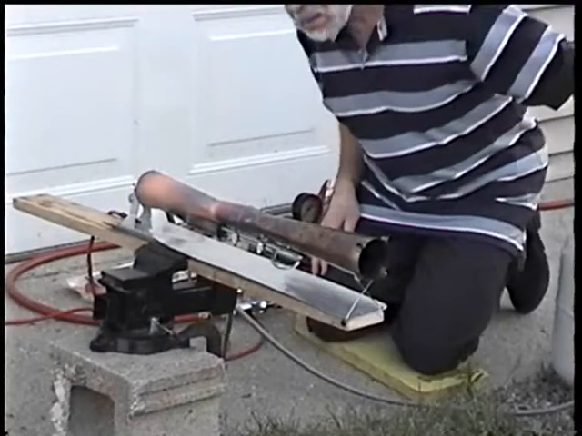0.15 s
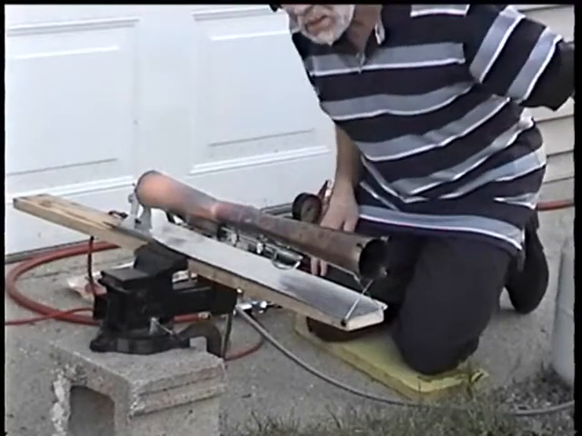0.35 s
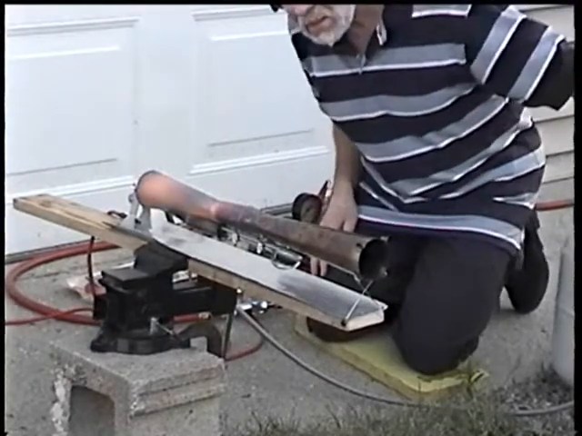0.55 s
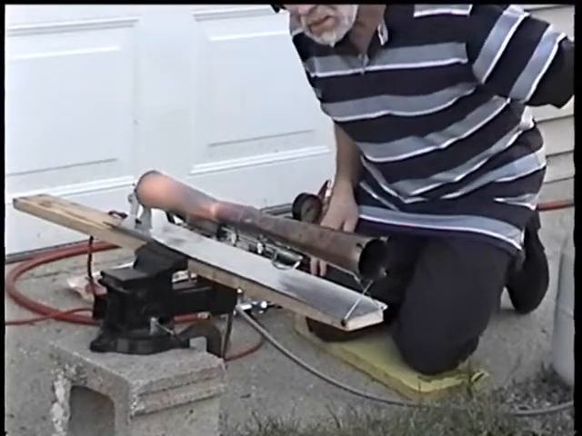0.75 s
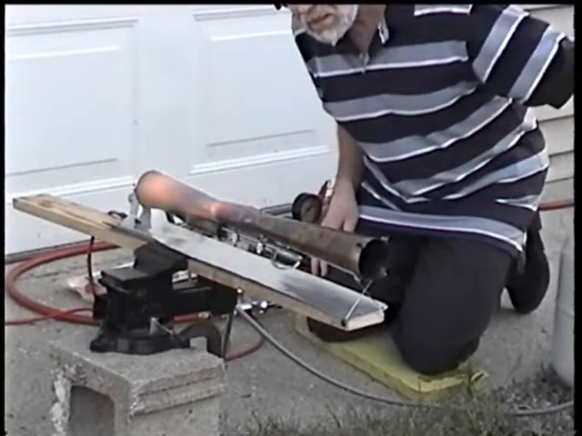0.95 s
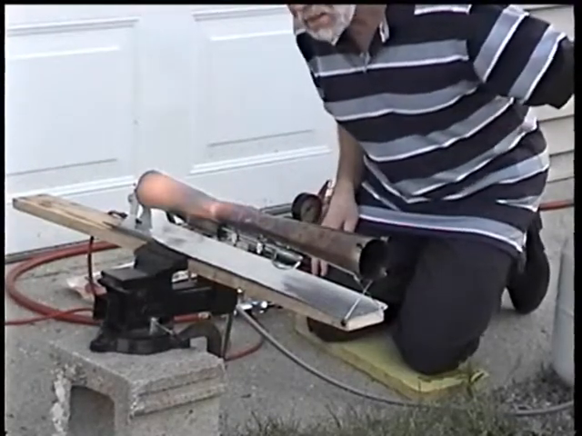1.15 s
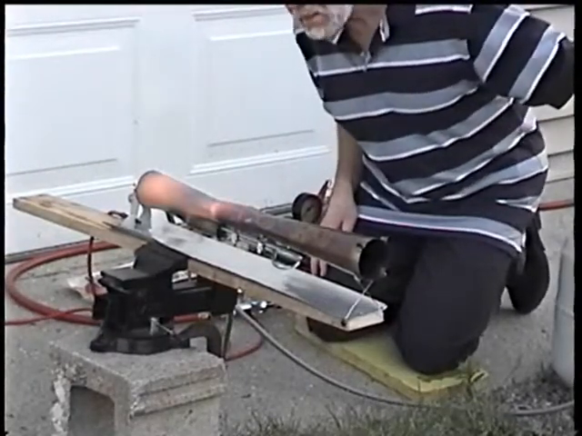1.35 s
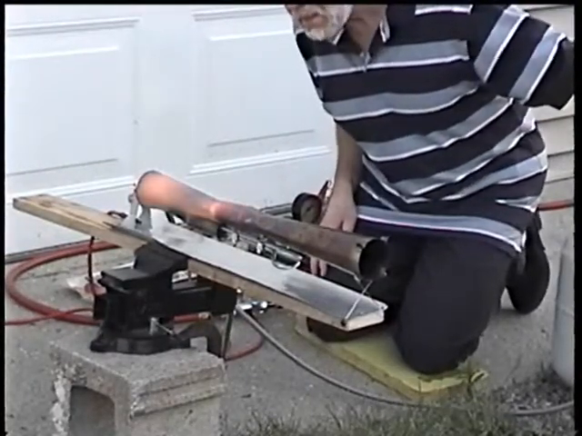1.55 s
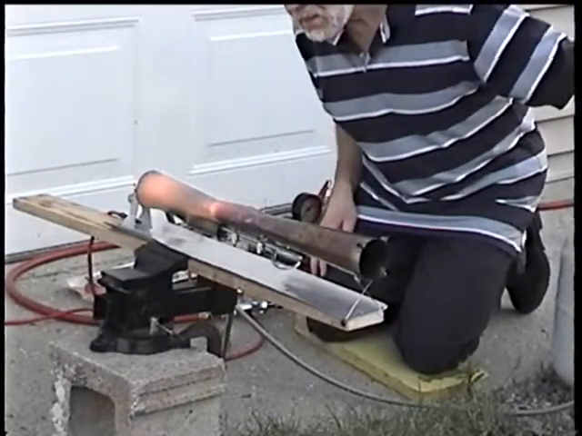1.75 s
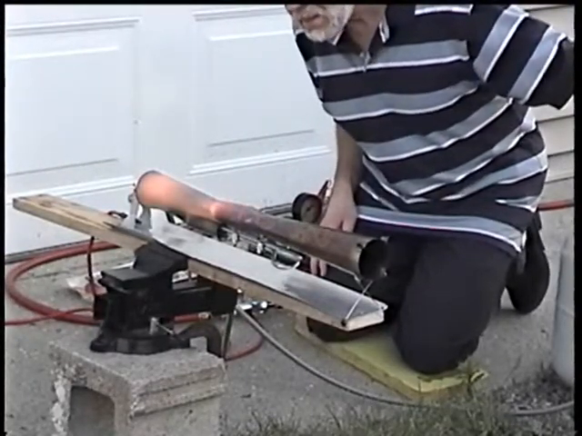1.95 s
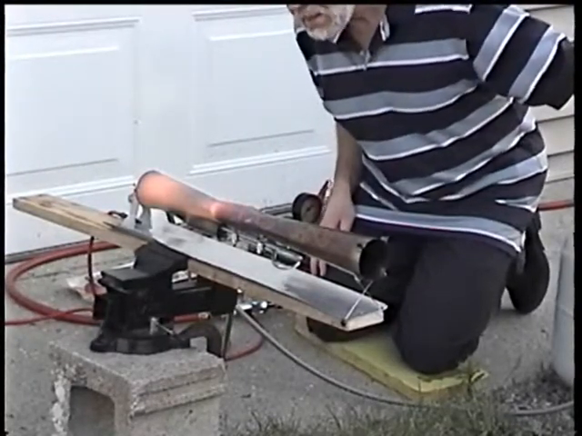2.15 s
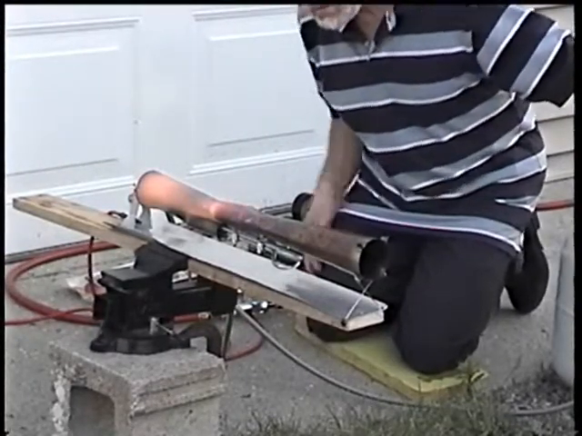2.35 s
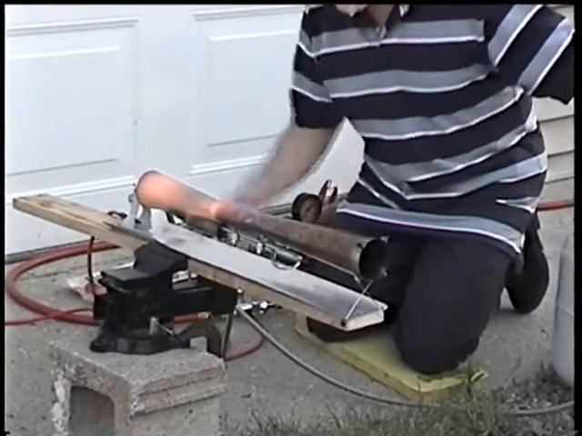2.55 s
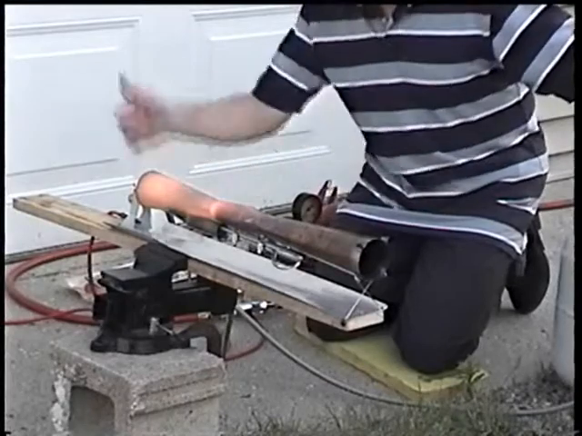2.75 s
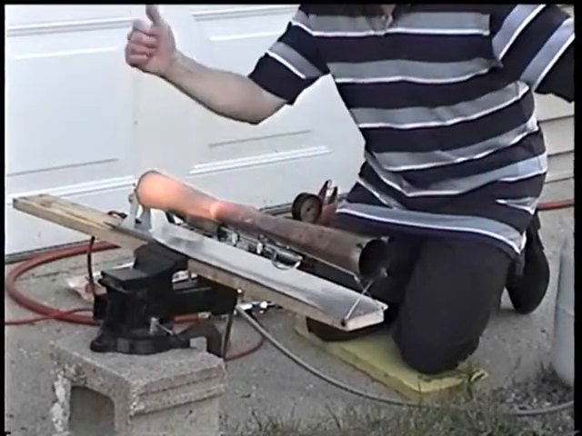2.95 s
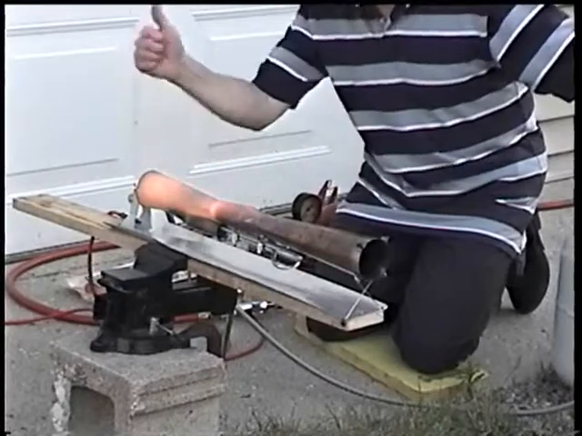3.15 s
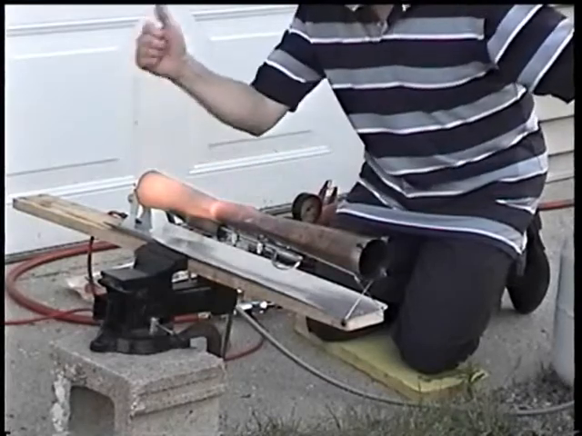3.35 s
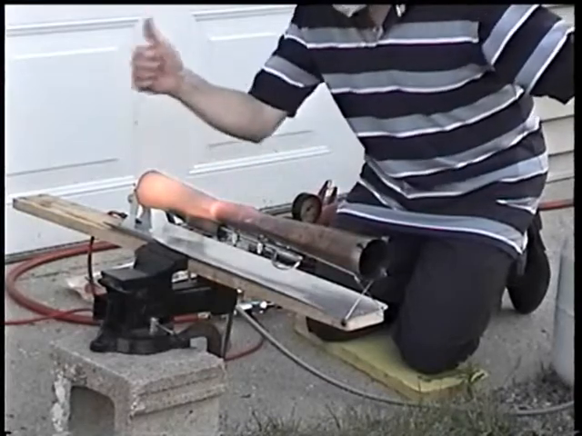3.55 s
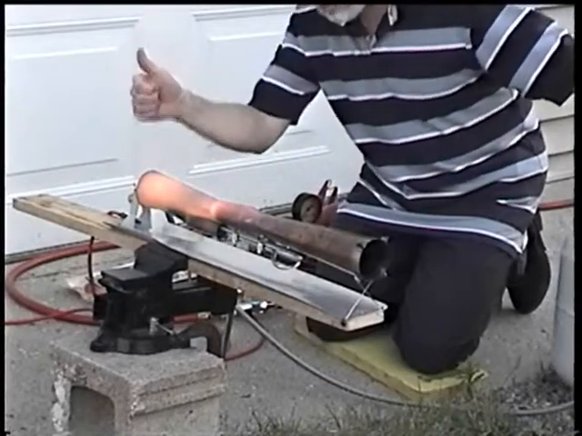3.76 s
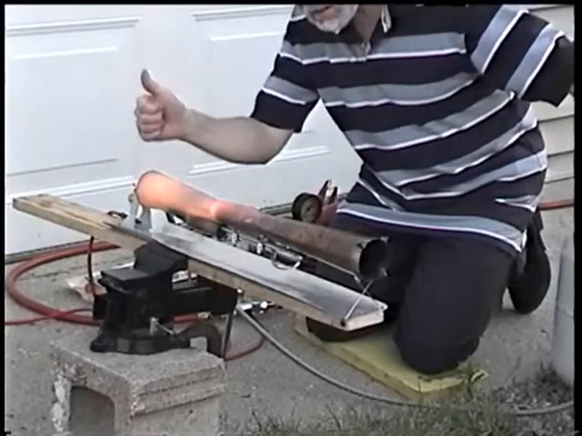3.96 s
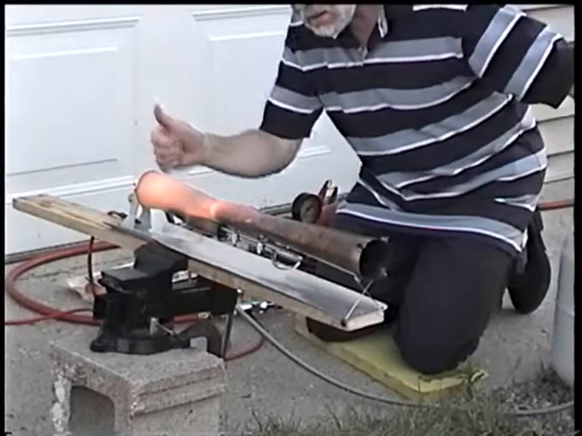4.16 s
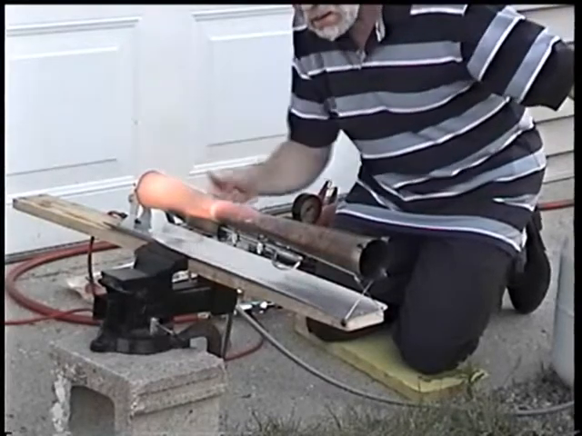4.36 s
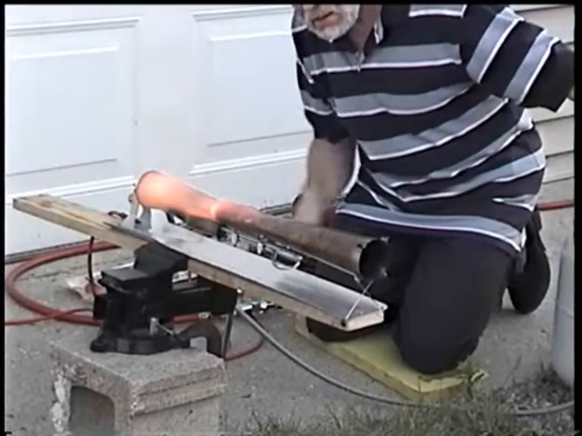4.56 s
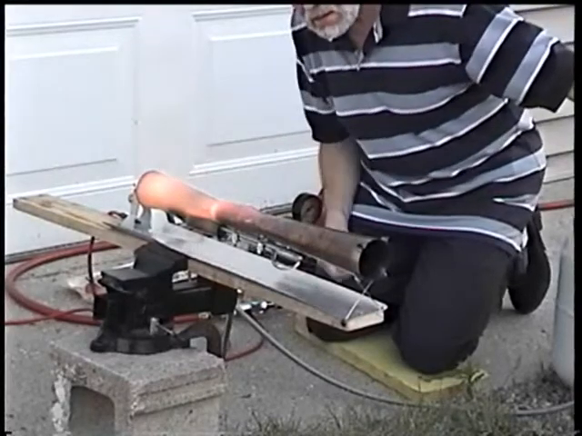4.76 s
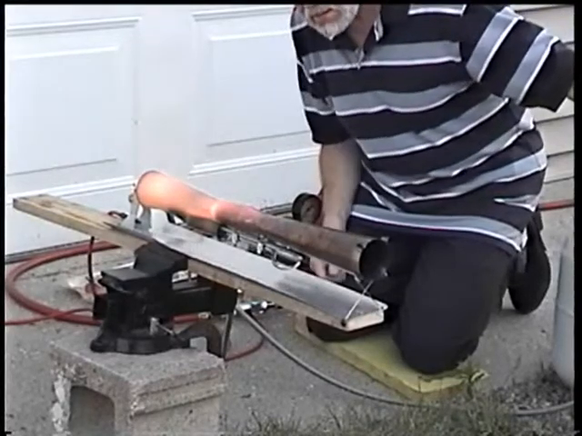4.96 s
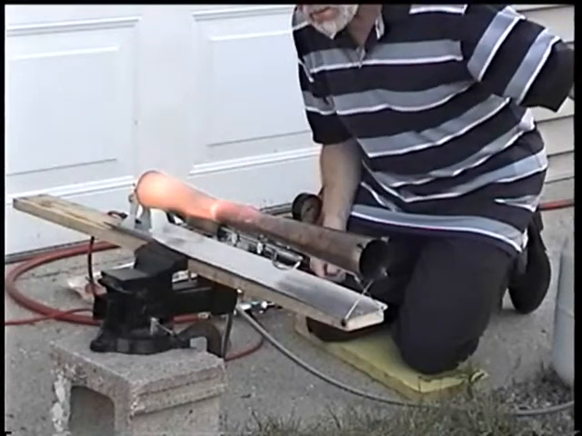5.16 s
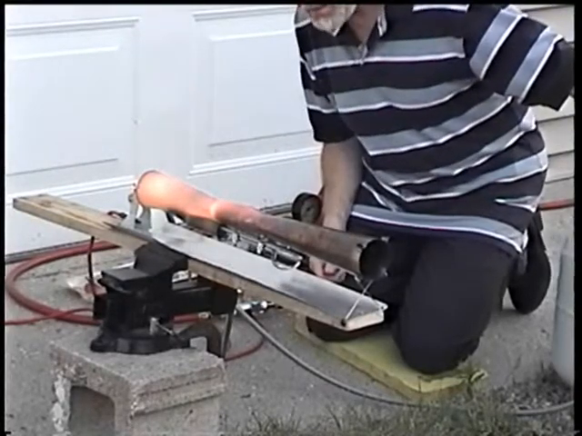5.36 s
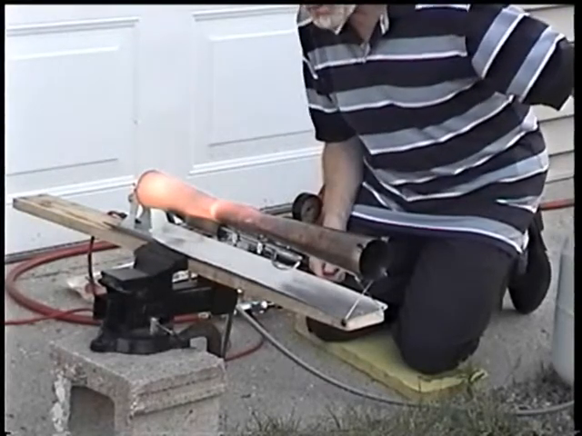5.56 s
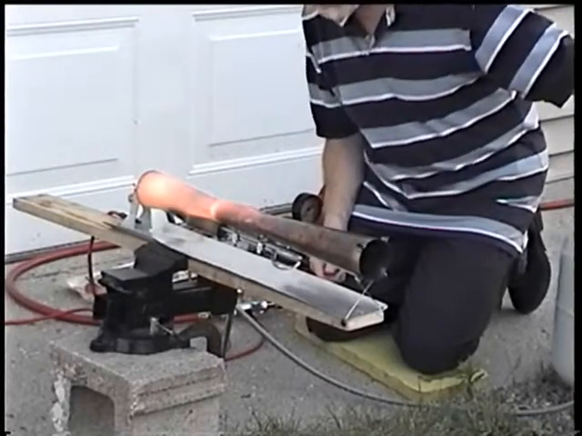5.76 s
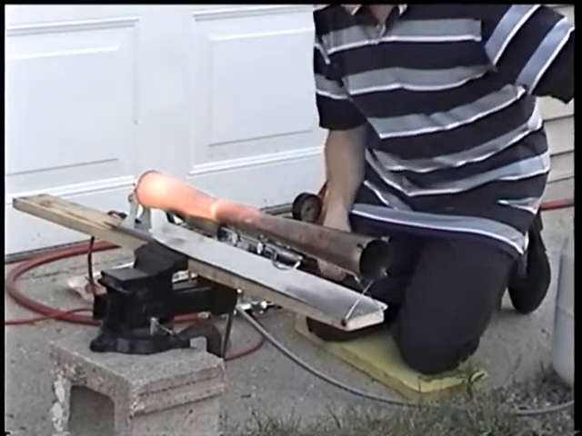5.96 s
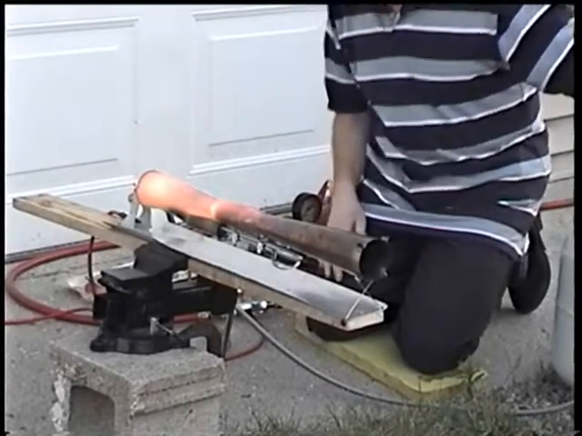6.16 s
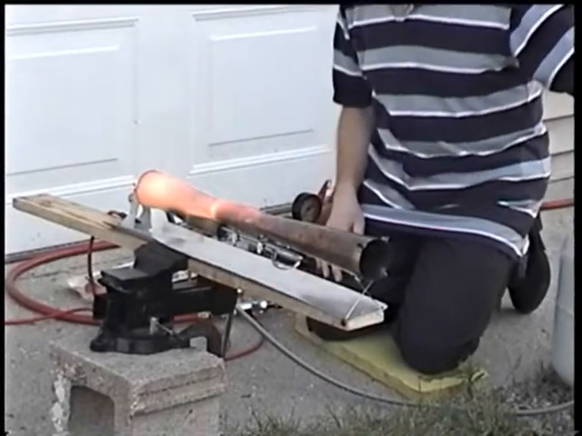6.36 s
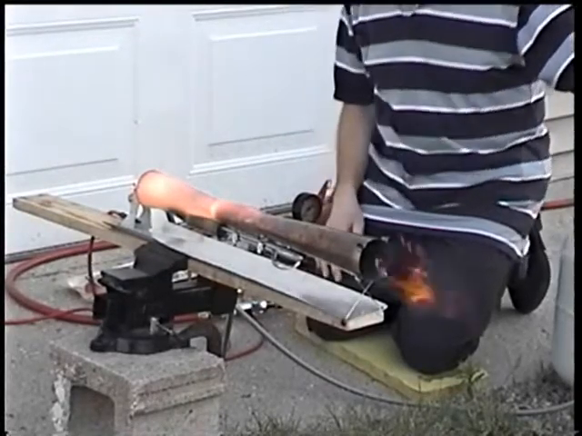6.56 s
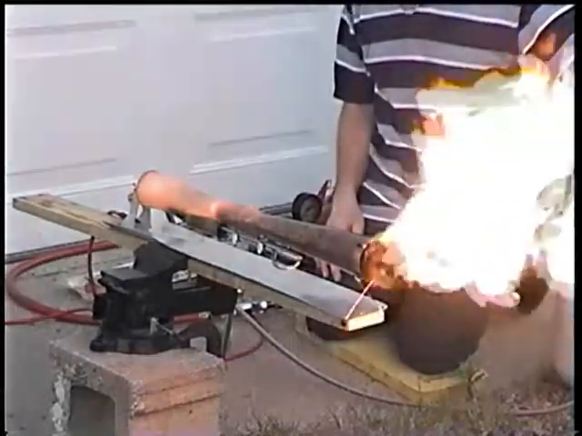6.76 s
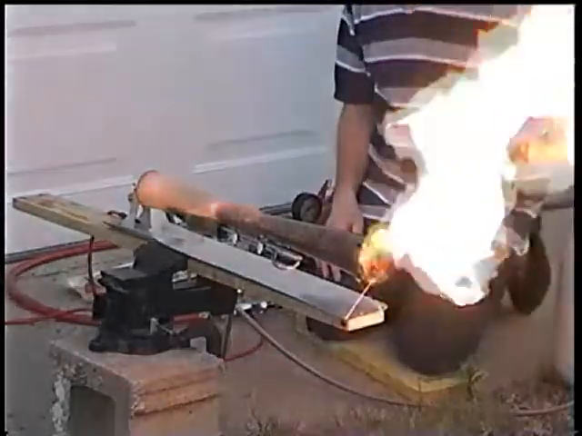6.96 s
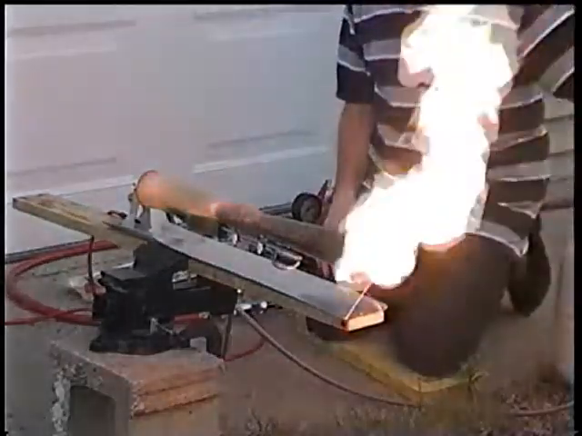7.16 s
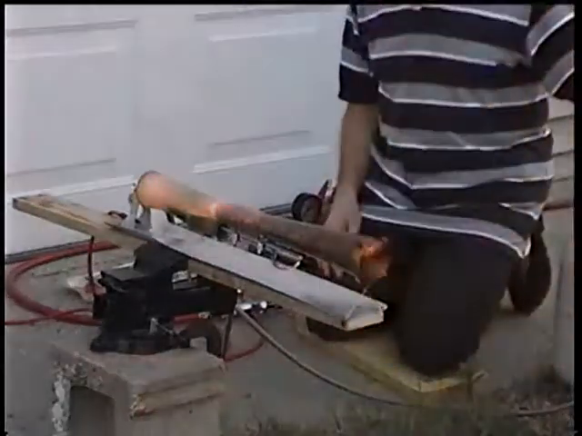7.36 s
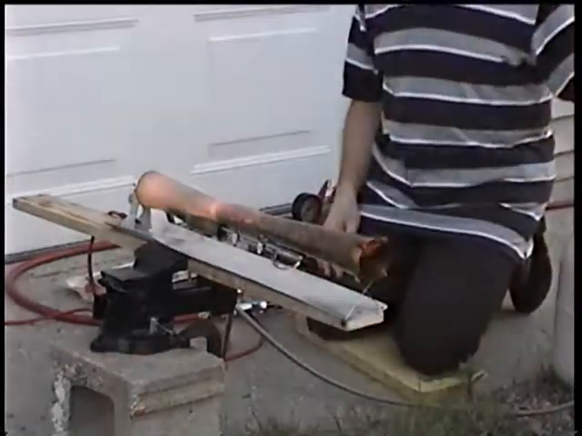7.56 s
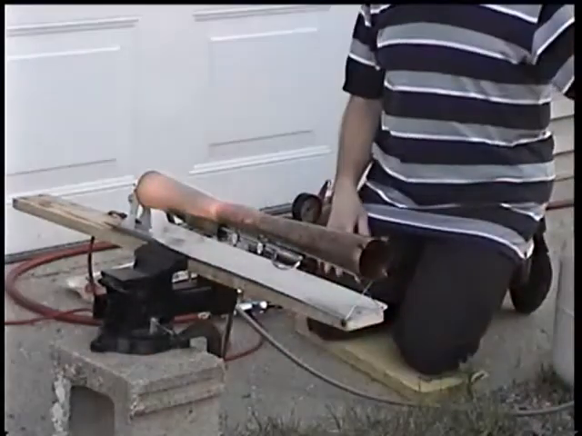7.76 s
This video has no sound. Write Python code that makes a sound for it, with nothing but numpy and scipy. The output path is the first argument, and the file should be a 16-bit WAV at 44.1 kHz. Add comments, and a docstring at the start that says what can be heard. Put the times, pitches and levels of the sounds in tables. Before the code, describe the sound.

A very loud, overloaded metal jet pipe drones in a yard, its dense buzzing mixed with turbulent roar, airy rush and metallic rasp. The pitch rises almost imperceptibly, with small sagging stumbles that cluster near the end. After about six and a half seconds it chokes off in rapid gasps, exposing escaping gas, fluttering flame, one sharp hollow double pop, and weak whistling resonance in near silence.

```python
"""Homemade pulsejet in a yard

Outdoors, two microphones stand before a droning pulsejet so loud that it overloads them.
Each cycle is a tailpipe blast and a shorter intake blast, shaken by turbulent burning, with rush and rasp.
It flames out; gas hisses until its valve is shut, and open flame rumbles at the mouth as coloured noise.
The flame pops back into the tube, whose narrow wavering tones sing on faintly over the quiet yard."""
import sys
import numpy as np
from scipy import signal
from scipy.fft import rfft, irfft, next_fast_len
from scipy.io import wavfile

SR = 44100
rng = np.random.default_rng(int(sys.argv[2]) if len(sys.argv) > 2 else 0)


def log_audio(samples):
    """Write samples as a 16-bit WAV file to the path given in sys.argv[1]."""
    # one column per channel
    frames = np.atleast_2d(samples).T
    # limit to full scale, then quantise
    limited = np.clip(frames, -1, 1)
    pcm = np.round(limited * 32767).astype(np.int16)
    wavfile.write(sys.argv[1], SR, pcm)


N = 344862
TIME = np.arange(N) / SR  # s


def amp(db):
    """Decibels to a pressure factor."""
    return 10 ** (np.asarray(db) / 20)


def evened(x):
    """Scales to rms 1."""
    return x / np.sqrt(np.mean(x ** 2) + 1e-20)


def colour(points, hz):
    """Gain of a spectrum table at the given frequencies, straight in dB over log frequency."""
    f, db = np.transpose(points)
    return amp(np.interp(np.log(hz + 1), np.log(f + 1), db))


def noise(points, apart):
    """Coloured noise at two microphones, rms 1; apart is the size of what differs between them."""
    size = next_fast_len(N)
    gain = colour(points, np.fft.rfftfreq(size, 1 / SR))
    spectrum = rfft(rng.standard_normal((2, size))) * gain
    shared, differing = irfft(spectrum, size)[:, :N]
    return evened(np.array([shared + apart * differing, shared - apart * differing]))


def wander(hz):
    """Slow chance of rms 1, up to about hz."""
    size = next_fast_len(N)
    slowing = 1 + (np.fft.rfftfreq(size, 1 / SR) / hz) ** 2
    return evened(irfft(rfft(rng.standard_normal(size)) / slowing, size)[:N])


def ramp(start, end):
    """Rises in a straight line from 0 to 1 between two times."""
    return np.clip((TIME - start) / max(end - start, 1 / SR), 0, 1)


def swell(s, rise, fade):
    """Grows to 1 at time s and dies away again."""
    return np.exp(-abs(TIME - s) / np.where(TIME < s, rise, fade))


# the flame-out: when it begins, how long the slowing takes, and the share of the rate lost
FLAME_OUT_S, SLOWING_S, SLOWING_SHARE = 6.57, 0.028, 0.18


def faltering():
    """Share by which the firing has slowed: zero until the flame-out."""
    return SLOWING_SHARE * ramp(FLAME_OUT_S, FLAME_OUT_S + SLOWING_S)


# stumbles of the firing rate: t/s of the deepest sag, sag f/Hz, recovery t/s
STUMBLE_TIMES = [(0.731, 4.2, 0.23), (3.38, 2.95, 0.27), (5.649, 7.4, .2), (6.261, 9, 0.079),
                 (6.39, 9, 0.0398)]
SAG_S = 0.04034  # time taken to sag


def sag():
    """Hz by which the stumbles pull the firing rate down: a quick fall and a decaying recovery."""
    total = 0
    for s, hz, recovery in STUMBLE_TIMES:
        recovering = np.exp(-np.maximum(TIME - s, 0) / recovery)
        total = total + hz * ramp(s - SAG_S, s) * recovering
    return total


# the tube passes from warm to glowing; later the mixture drifts and the engine runs ragged (from s, to s)
GLOW_S = (1.5, 3)
RAGGED_S = (4.5, 5.7)
# turbulence when warm, then what the glow, ragged running and each Hz of sag add
TURBULENCE_DB, GLOW_DB, RAGGED_DB, SAG_DB_PER_HZ = 0.03, 1.3, 0.55, 0.1


def turbulence_db():
    """The burning roughens as the tube glows, as the mixture drifts and in each stumble."""
    heat_and_mixture = GLOW_DB * ramp(*GLOW_S) + RAGGED_DB * ramp(*RAGGED_S)
    return TURBULENCE_DB + heat_and_mixture + SAG_DB_PER_HZ * sag()


# last gasps of the dying engine: t/s of the peak, level/dB re its running strength
LAST_GASPS = [(6.598, 5), (6.624, -5), (6.648, -8)]
DYING_DB_PER_S = 604


def strength_db():
    """Steady while the engine runs, then a few ever weaker gasps."""
    running = -DYING_DB_PER_S * np.maximum(TIME - LAST_GASPS[0][0], 0)
    gasps = [db - DYING_DB_PER_S * abs(TIME - s) for s, db in LAST_GASPS]
    return np.max([running] + gasps, axis=0)


# background of the quiet yard: f/Hz, relative level/dB per Hz
YARD_COLOUR = [(40, -1), (130, 0), (250, -12), (600, -5), (1500, 0), (2200, -8), (3500, -12.5),
               (6800, -20.5), (8200, -12.5), (9500, -22), (15000, -33)]


def yard(yard_db=-52.5):
    """Steady faint air of the place, independent noise at each microphone."""
    return amp(yard_db) * noise(YARD_COLOUR, apart=1.0)


# surges of the draught: t/s of the middle, level/dB above the settling flow, length t/s
DRAUGHT_SURGES = [(7.185, 8, .01), (7.47, 3.5, 0.043)]
# steady level, and the extra flow at the flame-out with its decay time
DRAUGHT_DB, AFTERFLOW_DB, AFTERFLOW_S = -48.5, 12, 0.19


def draught_db():
    """Air flow through the tube: it settles after the flame-out and surges now and then."""
    afterflow = AFTERFLOW_DB * np.exp(-np.maximum(TIME - LAST_GASPS[0][0], 0) / AFTERFLOW_S)
    surges = sum(db * np.exp(-((TIME - s) / length) ** 2) for s, db, length in DRAUGHT_SURGES)
    return DRAUGHT_DB + afterflow + surges


# tones of the tube singing in the draught: f/Hz, width f/Hz, relative level/dB at the end, growth dB per s
SINGING_TONES = [(359, 10.26, -9.5, -10.5), (716, 8.7, -9.5, -7), (1134, 19.4, -15, -10),
                 (1227, 2.5, -14, 5), (1490, 2.6, 4.5, 7), (1900, 2.7, -13, 5), (1800, 14, -24, -5),
                 (2030, 3.4, -19, -3), (2670, 2.3, -12.5, -1)]


def tube(tube_db=-2, waver=0.055):
    """Narrow tones of the tube under a weak draught; the broader a tone, the more it wavers."""
    tones, power = np.zeros(N), np.zeros(N)
    for hz, width, db, growth in SINGING_TONES:
        size = amp(db + growth * (TIME - TIME[-1]))
        turns = np.cumsum(hz + width / 2 * wander(19.0)) / SR
        tones += size * (1 + waver * width * wander(18)) * np.sin(2 * np.pi * turns)
        power += size ** 2 / 2
    # the table sets only the balance of the tones; the draught sets the level
    level = ramp(FLAME_OUT_S, LAST_GASPS[0][0]) * amp(tube_db + draught_db())
    return tones / np.sqrt(power) * level * amp([[1], [-1]])  # left, right dB


# pops of the flame: t/s, level/dB before the side gains, length of the push t/s
FLAME_POPS = [(7.2412, -11.5, 0.0017), (7.2464, -10, 0.0017)]


def flashback(flashback_db=-33, swell_s=0.019, note_hz=340):
    """The flame runs back up the tube, and the air column swells just before the pop."""
    before = TIME - FLAME_POPS[0][0]
    growth = np.exp(-abs(before) / swell_s) * (before < 0)
    return amp(flashback_db) * growth * np.sin(2 * np.pi * note_hz * before) * amp([[2], [-3]])


# the air column that the pop rings: f/Hz, level/dB before the side gains, t60/s
COLUMN_MODES = [(385, -22.5, 0.19), (470, -21.5, 0.085), (750, -35, 0.24), (1100, -22, 0.026),
                (2300, -24, 0.027)]


def pop(crack_db=-9, crack_s=0.0044, echo_db=-31, echo_s=0.06):
    """Unburnt gas ignites: a push of air, a crack, a short ring and a scatter from the yard."""
    bursts = np.zeros((2, N))
    # f/Hz, relative level/dB per Hz
    grit_colour = [(100, 6), (400, 7), (1100, -10), (2500, -13), (3300, -23), (8000, -25), (15000, -38)]
    grit = noise(grit_colour, apart=0.49)
    for s, db, length in FLAME_POPS:
        t = np.maximum(TIME - s, 0)
        onset = 1 - np.exp(-t / 0.00007)
        push = (1 - t / length) * np.exp(-t / length) * onset
        scatter = amp(crack_db) * np.exp(-t / crack_s) + amp(echo_db) * np.exp(-t / echo_s)
        bursts += amp(db) * (t > 0) * (push + scatter * grit)
    t = np.maximum(TIME - FLAME_POPS[0][0], 0)
    ring = sum(amp(db - 60 * t / t60) * np.sin(2 * np.pi * hz * t) for hz, db, t60 in COLUMN_MODES)
    thump = signal.lfilter(*signal.butter(1, 150, "high", fs=SR), bursts + ring)
    return thump * amp([[3], [-4]])


# flares of the open flame: t/s of the peak, level/dB before the flame gain, rise t/s, fade t/s
FLAME_FLARES = [(6.65, -54, .1, 0.26), (6.98, -45, .09, 0.2), (7.3, -51, .04, 0.035),
                (7.78, -53, .025, .04)]
# colour of the open flame: f/Hz, relative level/dB per Hz
FLAME_RUMBLE = [(25, -8), (90, 1), (150, -2), (270, -6), (400, -12), (1000, -41), (8000, -80)]


def flame(flame_db=1):
    """Soft rumble of the flame that flares at the mouth of the tube."""
    size = sum(amp(db) * swell(s, rise, fade) for s, db, rise, fade in FLAME_FLARES)
    return amp(flame_db) * size * noise(FLAME_RUMBLE, apart=1.0)


# gas escaping unburnt from the jet: f/Hz, relative level/dB per Hz
GAS_HISS = [(200, -27), (280, 0), (460, -21), (700, -6.5), (1200, -10), (1700, -1.5), (2100, 6),
            (2500, -4.5), (3200, -7), (3700, -1.5), (4700, -8.5), (6000, -1), (7400, -6.5), (8700, -13),
            (11000, -0.5), (15000, -17)]
GAS_ON_S, GAS_RISE_S = 6.58, 0.094
# start of the closing, and the loss in dB reached one turn time later
VALVE_S, VALVE_TURN_S, VALVE_SHUT_DB = 7.09, 0.095, -32


def gas(gas_db=-34):
    """Fuel hisses through the jet until the valve shuts, slowly at first and then quickly."""
    closing = np.maximum(TIME - VALVE_S, 0) / VALVE_TURN_S
    flow = ramp(GAS_ON_S, GAS_ON_S + GAS_RISE_S) * amp(VALVE_SHUT_DB * closing ** 2)
    return flow * amp(gas_db + .5 * wander(30)) * noise(GAS_HISS, apart=0.28)


# the firing rate climbs steadily as the tube heats
FIRING_HZ, CLIMB_HZ_PER_S = 364.3, 1.05


def firing(jitter=0.0079, stumble=0.49, sway=0.029):
    """Count of cycles; turbulence shakes the timing, which stumbles as the engine dies."""
    turbulence = amp(turbulence_db() - np.mean(turbulence_db()))
    rate = (FIRING_HZ + CLIMB_HZ_PER_S * TIME - sag()) * (1 - faltering())
    turns = np.cumsum(rate) / SR
    shaking = (jitter * turbulence + stumble * faltering()) * wander(120)
    swaying = sway * turbulence ** 4 * wander(14.3)
    return turns + shaking + swaying


# airy rush around the jet: f/Hz, relative level/dB per Hz
RUSH_COLOUR = [(30, -14), (60, -1), (160, 9), (300, 17), (600, 10.5), (850, 6), (1500, 8), (4000, -3),
               (9000, -4), (15000, -66)]


def rush(turns, rush_db=-26, pulsing=0.32):
    """Airy noise of the jet stream, pulsing with the firing and different at each microphone."""
    puffs = (1 + pulsing * np.cos(2 * np.pi * (turns - .15))) * amp(-90 * faltering())
    level = amp(rush_db + strength_db() + 1 * wander(34))
    return level * puffs * noise(RUSH_COLOUR, apart=1) * amp([[1], [-1]])


# metallic rasp of the blast fronts: f/Hz, rms level/dB while the tube warms, rms level/dB when it is hot
RASP_OVERTONES = [(2570, -55, -37), (3290, -35, -58), (3660, -45, -42), (4040, -44, -43), (5140, -40, -41),
                  (5870, -43, -39), (6240, -42, -49), (6970, -47, -44), (7340, -44, -54)]


def rasp(turns, blur=0.5, ragged_db=-6):
    """High overtones of the firing, which shift with heat and drown in turbulence."""
    heat, overtones = ramp(*GLOW_S), np.zeros(N)
    mean_hz = FIRING_HZ + CLIMB_HZ_PER_S * np.mean(TIME)
    for hz, warm_db, hot_db in RASP_OVERTONES:
        multiple = np.round(hz / mean_hz)  # the nearest harmonic is what sounds
        phase = 2 * np.pi * multiple * turns + blur * wander(40)
        overtones += amp(warm_db + heat * (hot_db - warm_db)) * np.sin(phase)
    fading = amp(ragged_db * ramp(*RAGGED_S)) * (1 - faltering() / SLOWING_SHARE)
    return np.sqrt(2) * overtones * fading


def blast(turns, length, edge):
    """One steep-sided plateau of pressure a cycle; length and edge are in cycles."""
    from_centre = abs((turns + .5) % 1 - .5)
    return 1 + np.tanh((length / 2 - from_centre) / edge)


# turbulent roar: f/Hz, relative level/dB
ROAR_COLOUR = [(40, -18.5), (280, -2.5), (450, -5), (650, -7.5), (830, 5.5), (1050, -2), (1300, 2),
               (1600, -1), (2200, 1), (3000, -3.5), (5000, -6), (9000, -12), (15000, -22)]
# both blasts lengthen steadily: length at the start, growth per second
TAILPIPE_CYCLES, TAILPIPE_CYCLES_PER_S = 0.26, 0.0031
INTAKE_CYCLES, INTAKE_CYCLES_PER_S = .21, .0055


def engine(turns, edge=0.023, intake_lag=0.348, roar_db=-7, drive_db=-4, rest=0.86, surge_depth=0.32, surge_at=0.076):
    """Tailpipe and intake blasts with roar at the microphones, in units of their overload point."""
    # a stumbling or dying engine loses its steep fronts
    edge = edge + 0.0017 * sag() * ramp(*RAGGED_S) + 0.8 * abs(faltering())
    tailpipe_length = TAILPIPE_CYCLES + TAILPIPE_CYCLES_PER_S * TIME + 0.0022 * wander(320)
    tailpipe = blast(turns, tailpipe_length, edge)
    # the intake blast follows sooner once the gas in the tube is hot, and then in each stumble
    lag = intake_lag + 0.01 * (1 - ramp(*GLOW_S)) - 0.0033 * sag() * ramp(*GLOW_S)
    intake_length = INTAKE_CYCLES + INTAKE_CYCLES_PER_S * TIME + 0.0037 * wander(200)
    intake = blast(turns - lag, intake_length, edge)
    # the roar surges once a cycle, as the gas leaves the tube
    surge = 1 + surge_depth * np.cos(2 * np.pi * (turns - surge_at))
    roar_level = amp(roar_db + turbulence_db() + 1.24 * wander(37))
    roar = roar_level * surge * noise(ROAR_COLOUR, apart=0.27)
    pressure = rest - tailpipe - intake + roar * amp(-45 * faltering())
    return amp(drive_db + strength_db()) * pressure


# colour of the microphones: f/Hz, level/dB
MICROPHONE_COLOUR = [(150, -2), (370, 4), (730, 4.5), (1100, 4.5), (1600, 0.5), (2200, 1), (4000, 2),
                     (8000, 2), (12000, 4.5), (15500, 0.5)]


def overload(pressure, ceiling_db=-9.5, low_cut_hz=150):
    """The microphones flatten the blasts; their bass cut makes each flat top sag."""
    # doubling the sample rate keeps the clipping from folding back
    doubled = signal.resample_poly(pressure, 2, 1, axis=1)
    flat = signal.resample_poly(np.tanh(doubled), 1, 2, axis=1)
    sagging = signal.lfilter(*signal.butter(1, low_cut_hz, "high", fs=SR), flat)
    # minimum phase, so that the response comes after each front
    log_gain = np.log(colour(MICROPHONE_COLOUR, abs(np.fft.fftfreq(2048, 1 / SR))))
    causal = np.fft.ifft(np.exp(np.conj(signal.hilbert(log_gain)))).real
    response = causal[None, :len(causal) // 2]
    return amp(ceiling_db) * signal.oaconvolve(sagging, response, axes=1)[:, :N]


# how the wall and the ground favour one microphone: f/Hz, left minus right level/dB
SIDE_LEAN = [(150, 5.5), (370, 2), (730, -1.5), (1100, 0), (2000, -0.5)]


def lean(pair):
    """Raises each frequency on one side and lowers it on the other, half the difference each."""
    size = next_fast_len(N)
    tilt = np.sqrt(colour(SIDE_LEAN, np.fft.rfftfreq(size, 1 / SR)))
    return irfft(rfft(pair, size) * np.array([tilt, 1 / tilt]), size)[:, :N]


def scene():
    """The overloading engine, then the small sounds that it leaves."""
    turns = firing()
    running = lean(overload(engine(turns))) + rasp(turns) + rush(turns)
    aftermath = gas() + flame() + tube() + flashback() + pop()
    return yard() + aftermath + running


EDGE_HZ = 15500


def record(dry):
    """Low-pass at the upper band limit of the microphone chain."""
    low_pass = signal.firwin(511, EDGE_HZ, window=("kaiser", 9), fs=SR)
    return signal.oaconvolve(dry, low_pass[None], "same")


dry = scene()
out = record(dry)
log_audio(out)
```